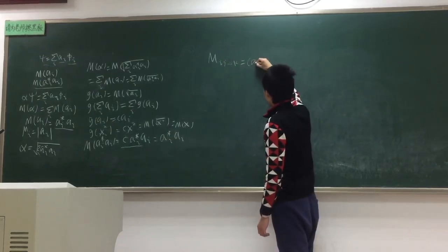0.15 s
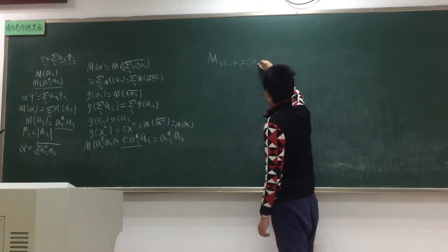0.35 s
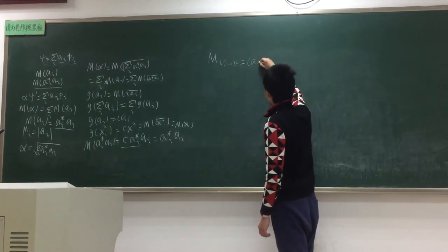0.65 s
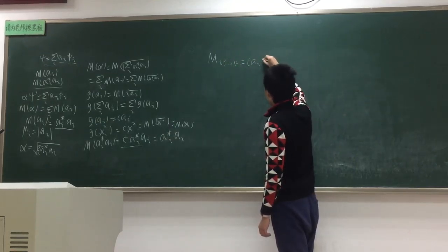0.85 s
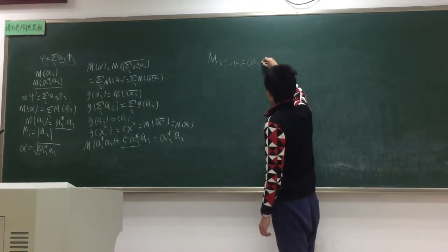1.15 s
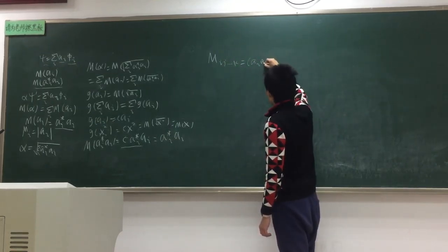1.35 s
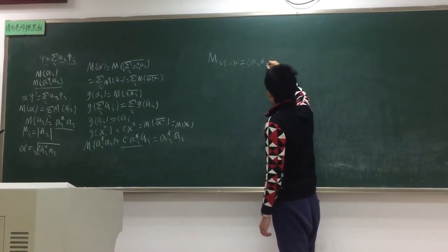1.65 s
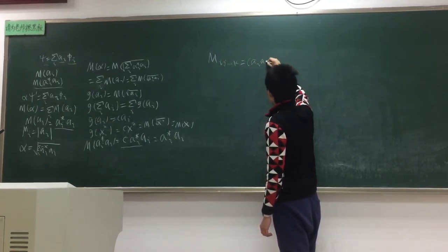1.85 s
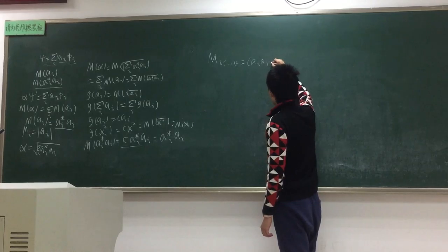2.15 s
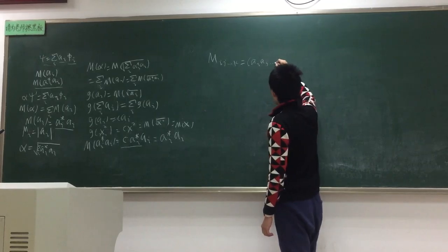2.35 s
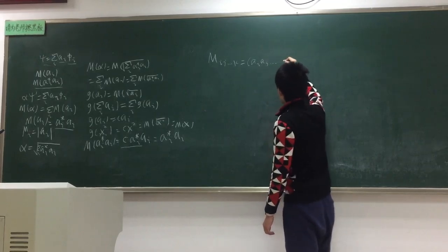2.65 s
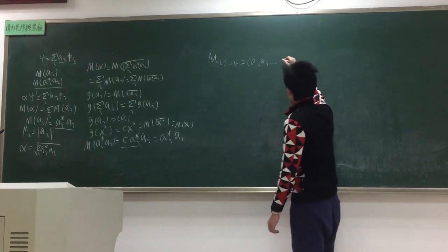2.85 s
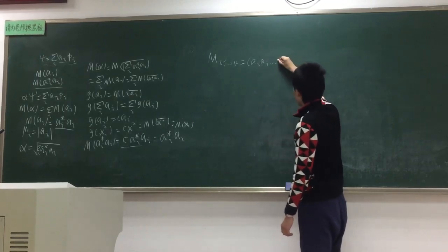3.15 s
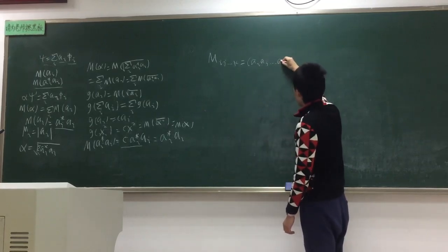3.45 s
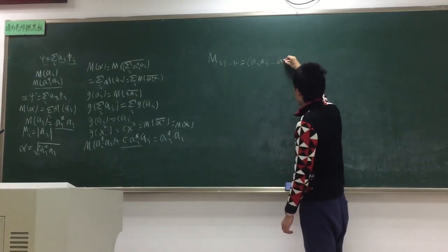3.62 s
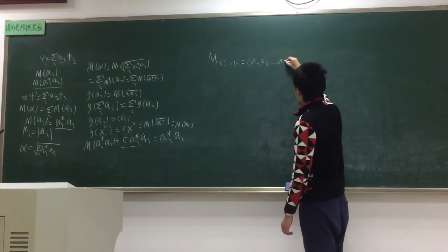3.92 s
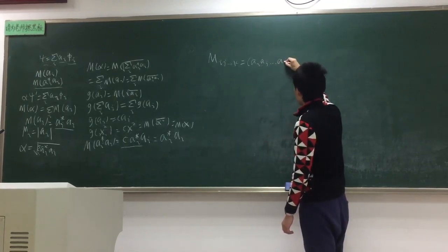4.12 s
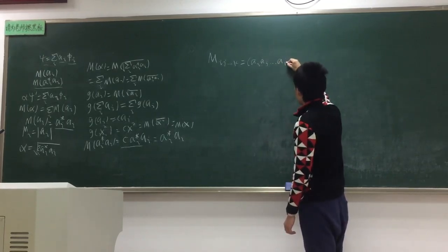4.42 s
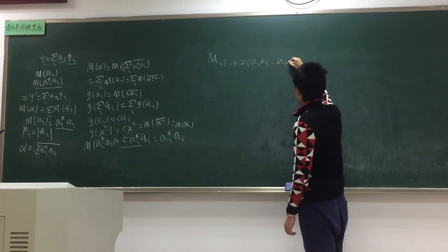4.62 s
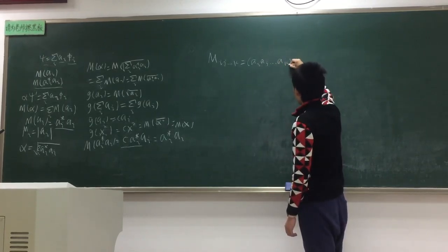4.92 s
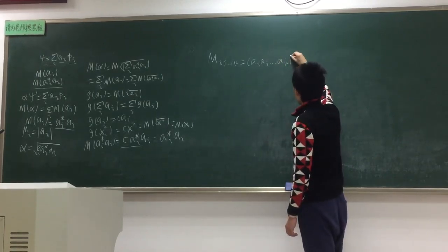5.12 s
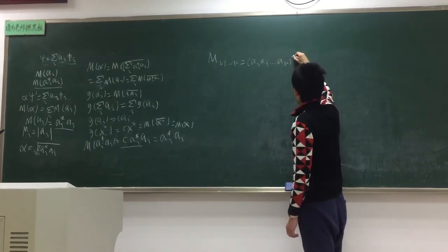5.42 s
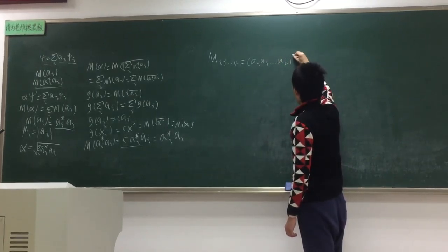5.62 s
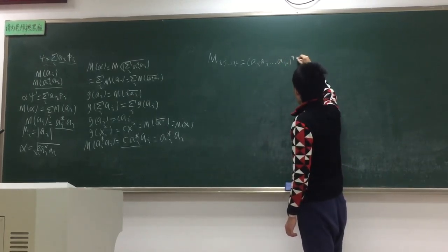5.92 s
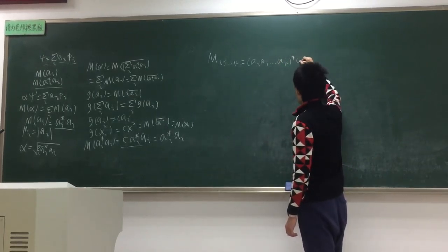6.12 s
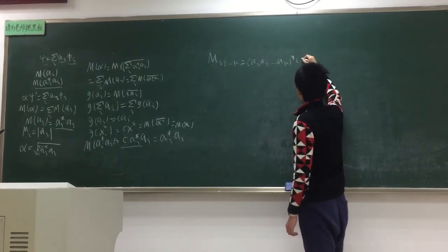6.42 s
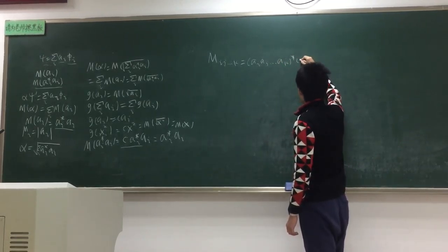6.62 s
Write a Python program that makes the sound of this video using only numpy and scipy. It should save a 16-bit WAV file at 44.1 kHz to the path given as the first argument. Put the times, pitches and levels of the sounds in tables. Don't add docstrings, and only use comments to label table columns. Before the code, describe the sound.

Uneven chalk blows on a hollow panel, some sharp and fizzy, others soft and dull, heard from a few metres in a reverberant classroom. Tiny crumbs tick between strokes. Around the middle, writing pauses for a short sliding step, soles hissing and small stones clicking on the floor. Lighter, then steadier knocks follow over quiet air hiss and low ventilation rumble.

```python
import sys
import numpy as np
from scipy import signal
from scipy.fft import rfft, irfft
from scipy.io import wavfile
from scipy.ndimage import uniform_filter1d

SR = 44100
rng = np.random.default_rng(int(sys.argv[2]) if len(sys.argv) > 2 else 0)


def transcribe(signal):
    frames = np.atleast_2d(signal).T
    limited = np.clip(frames, -1, 1)
    pcm = np.round(limited * 32767).astype(np.int16)
    wavfile.write(sys.argv[1], SR, pcm)


def gain_from_decibels(decibels):
    exponent = np.asarray(decibels, float) / 20
    return 10 ** exponent


N = 298510

# f/Hz, level/dB
PANEL_KNOCK = [(180, -43.5), (330, -26.5), (440, -17.5), (600, -7), (750, -4.5), (950, -4.5), (1100, -9),
               (1400, -13.5), (1650, -23.5), (2200, -57.5)]


def evened(x):
    return x / np.sqrt(np.mean(x ** 2) + 1e-20)


def read(points, hz):
    f, value = np.transpose(points)
    return np.interp(np.log(hz + 1), np.log(f + 1), value)


def add(mix, s, sound):
    part = mix[round(s * SR):][:len(sound)]
    part += sound[:len(part)]


def colour(x, points):
    gain = gain_from_decibels(read(points, np.fft.rfftfreq(len(x), 1 / SR)))
    return irfft(rfft(x) * gain, len(x))


def click(points):
    log_gain = np.log(gain_from_decibels(read(points, abs(np.fft.fftfreq(2048, 1 / SR)))))
    pulse = np.fft.ifft(np.exp(np.conj(signal.hilbert(log_gain)))).real[:1024]
    return pulse / abs(pulse).max()


def placed(points, tilt_db, place_db):
    middle = np.exp(np.mean(np.log([hz for hz, _ in points])))
    tilt_db = np.clip(tilt_db, -18, 18)
    return click([(hz, db + shift + tilt_db * np.log2(hz / middle))
                  for (hz, db), shift in zip(points, place_db)])


def ring(hz, t60, rise):
    t = np.arange(6000) / SR
    return gain_from_decibels(-60 * t / t60) * np.sin(2 * np.pi * hz * t) * (1 - np.exp(-t / rise))


def echoed(x, echoes):
    early = np.zeros(2500)
    early[0] = 1
    for s, db in echoes:
        early[round(s * SR)] = gain_from_decibels(db)
    return signal.oaconvolve(x, early)[:N]


def air():
    # f/Hz, level/dB per Hz
    hiss_spectrum = [(15, -51), (25, -19.5), (72, -5.5), (149, -15), (217, -26.5), (256, -27), (439, -33),
                     (489, -36), (988, -35), (1400, -40), (1840, -42), (2110, -41.5), (3620, -46.5),
                     (11600, -53), (16000, -55)]
    # f/Hz, width/Hz, level/dB
    resonances = [(52.5, 19.4, 0), (75, 42, 1), (106.8, 11.8, 4.5), (139, 65, -9.5)]
    # t/s, level/dB
    draught = [(0, -66.5), (.3, -70.5), (1.4, -66.5), (2.6, -66.5), (3.15, -60), (3.9, -66.5), (4.3, -66),
               (4.95, -61), (5.5, -68.5), (6.1, -69.5), (6.45, -62), (6.77, -67)]
    hiss_db, gust_db, gust_s = -59.5, 3, 0.059
    a, b, c = rng.standard_normal((N, 3)).T
    span = round(gust_s * SR)
    gusts_db = gust_db * evened(uniform_filter1d(uniform_filter1d(c, span), span))
    hz = np.fft.rfftfreq(N, 1 / SR)
    hiss = gain_from_decibels(hiss_db) * evened(colour(a, hiss_spectrum))
    hiss = irfft(rfft(hiss) * hz ** 4 / (hz ** 4 + 165.0 ** 4), N)
    ducts = sum(gain_from_decibels(db) / (1 + ((hz - f) / (width / 2)) ** 2) for f, width, db in resonances)
    s, db = np.transpose(draught)
    rumble_db = np.interp(np.arange(N) / SR, s, db) + gusts_db
    return hiss + gain_from_decibels(rumble_db) * evened(irfft(rfft(b) * ducts, N))


def tail():
    # f/Hz, t60/s
    walls = [(300, 0.73), (520, 0.74), (800, 0.81), (1400, 0.61), (2500, 0.67), (5500, 0.31), (12000, 0.25)]
    # f/Hz, level/dB
    wet = [(300, -1.5), (540, 9), (800, 9), (1400, 10.5), (2500, 0), (6000, 6.5), (13000, -2)]
    hz, t, z = signal.stft(rng.standard_normal(SR), SR, nperseg=256)
    decay = gain_from_decibels(-60 * t / read(walls, hz)[:, None])
    late = signal.istft(z * decay, SR, nperseg=256)[1][:SR]
    late *= np.clip(np.arange(SR) / SR / 0.012, 0, 1)
    late = np.roll(late / np.linalg.norm(late), 300)
    return np.roll(colour(late, wet), -300)


def room(x):
    earlier_tap_db = -58
    same, other, drift = tail(), [tail(), tail()], np.linspace(0, 7.5, N)
    out = 1.007 * signal.fftconvolve(x, same)[:N]
    out += 0.76 * signal.fftconvolve(x * np.cos(drift), other[0])[:N]
    out += 0.71 * signal.fftconvolve(x * np.sin(drift), other[1])[:N]
    before = signal.fftconvolve(placed(PANEL_KNOCK, -8.0, np.zeros(10)), same)[round(.25 * SR):]
    before *= gain_from_decibels(-40 * np.arange(len(before)) / SR)
    add(out, 0, gain_from_decibels(earlier_tap_db) * before / np.sqrt(np.mean(before[:2000] ** 2)))
    return out


def gripped(points, ring_hz, upper_db):
    upper_mode_hz = 3420
    hz = np.geomspace(1000, 4600, 60)
    peak_db = 4.5 * np.exp(-((hz - ring_hz) / 170.0) ** 2)
    return list(zip(hz, read(points, hz) + peak_db + upper_db * (hz > upper_mode_hz)))


def taps():
    # t/s, level/dB, chalk ring f/Hz, grip tilt/dB per octave, fizz level/dB re blow (tip hardness)
    blows = [(0.381, -26, 2700, -5, -26.5), (0.703, -26.5, 1890, 5.5, -24), (1.023, -39, 2360, 9, -76),
             (1.292, -65, 2460, 23, -36), (1.58, -26, 1980, -5.5, -22.5), (1.916, -34, 2030, -9, -36),
             (2.145, -26.5, 2350, 7, -39), (2.302, -30, 2780, 1, -22.5), (2.448, -27, 2850, 4, -28.5),
             (3.143, -53.5, 1700, -4, -83), (3.85, -57.5, 2550, 7, -34), (4.209, -39, 2560, 4, -36),
             (4.478, -34, 2540, 4, -51), (4.851, -29.5, 2220, -3.5, -31), (5.24, -29.5, 2190, -7.5, -29),
             (5.5, -30.5, 2800, 4.5, -36), (5.721, -34.5, 2050, -1, -48), (6.025, -28.5, 1810, 7.5, -33.5),
             (6.613, -37, 2080, -4, -57)]
    # f/Hz, t60/s
    lowest_mode = (538.6, 0.043)
    # f/Hz, level/dB
    stick = [(1100, -43), (1600, -4.5), (2000, -2.5), (2400, 2.5), (3050, -1.5), (3300, -16.5),
             (3700, -9.5), (4500, -61.5)]
    # f/Hz, level/dB
    edge_spectrum = [(2500, -70), (3500, 2), (4300, 6), (5600, 8), (7000, -2), (8500, -21.5)]
    # f/Hz, level/dB
    fizz_spectrum = [(5500, -48), (7600, 3.5), (9500, 7.5), (10600, 3), (14000, -3.5), (16000, -7.5)]
    firm_db, hard_db = -30, -35
    boom_db, boom_db_per_s, boom_per_soft_db = 2, 0.84, 0.384
    knock_db, knock_per_soft_db, knock_per_fizz_db = -10.5, 0.1173, 0.0573
    edge_db, edge_per_fizz_db, upper_per_fizz_db = -24, 0.29, 0.19
    panel_tilt_db, panel_tilt_db_per_s, fizz_tilt_db = -0.24, 0.22, 11
    spot_spread_db = 1.8
    boom, panel, chalk = np.zeros((3, N))
    place, dust = rng.standard_normal((len(blows), 10)), rng.standard_normal((len(blows), 600))
    for (s, db, ring_hz, grip_db, fizz_db), p, d in zip(blows, place, dust):
        soft_db, extra_fizz_db = firm_db - db, fizz_db - hard_db
        low_db = db + boom_db + boom_db_per_s * s + boom_per_soft_db * soft_db
        add(boom, s + 0.0012, gain_from_decibels(low_db) * ring(*lowest_mode, 0.0038))
        tilt_db = panel_tilt_db + panel_tilt_db_per_s * (s - 3)
        add(panel, s + 0.001208, gain_from_decibels(db - 6.0) * placed(PANEL_KNOCK, tilt_db, spot_spread_db * p))
        stick_db = knock_db + knock_per_soft_db * soft_db + knock_per_fizz_db * extra_fizz_db
        held = gripped(stick, ring_hz, upper_per_fizz_db * extra_fizz_db)
        knock = gain_from_decibels(stick_db) * placed(held, grip_db, np.repeat(p, 6))
        knock += gain_from_decibels(edge_db + edge_per_fizz_db * extra_fizz_db) * click(edge_spectrum)
        knock += gain_from_decibels(fizz_db + 6.5) * placed(fizz_spectrum, fizz_tilt_db, p)
        add(chalk, s + 0.000771, gain_from_decibels(db) * knock)
        brush = d * gain_from_decibels(np.linspace(-60, -38, 600))
        add(chalk, s - 600 / SR, gain_from_decibels(db) * signal.oaconvolve(brush, knock))
    boom = signal.sosfilt(signal.butter(4, 420, "high", fs=SR, output="sos"), boom)
    return boom, panel, chalk


def lifts():
    # t/s, level/dB
    releases = [(0.8676, -61), (1.2114, -60.5), (1.3768, -60), (2.6873, -62), (3.2394, -78), (3.2685, -77),
                (3.338, -68), (5.014, -59), (5.669, -62), (5.9249, -83), (6.0646, -79), (6.1789, -56)]
    crumble_t60_s = 0.0082
    out, t = np.zeros(N), np.arange(300) / SR
    tick = click([(4000, -44), (7000, -8), (9000, -6), (14000, -9), (16000, -18.5)])
    for (s, db), d in zip(releases, rng.standard_normal((len(releases), 300))):
        crumbs = d ** 3 * gain_from_decibels(-60 * t / crumble_t60_s)
        add(out, s, gain_from_decibels(db + 4.5) * np.convolve(tick, crumbs / np.linalg.norm(crumbs)))
    return out


def grit():
    # t/s, level/dB, f/Hz
    stones = [(1.29, -62, 2560), (1.297, -62.5, 827), (1.308, -63.5, 2630), (2.709, -53, 308),
              (2.9098, -44.5, 2880), (2.911, -53, 1880), (2.93, -52, 2170), (2.94, -57, 630),
              (2.955, -54, 2350), (3.174, -48, 793), (3.239, -63, 2360), (3.245, -53.5, 974),
              (3.269, -54, 2800), (3.27, -57, 3650), (3.298, -48.5, 441), (3.35, -60, 1970),
              (3.4, -57, 1900), (3.432, -56, 2930)]
    # t/s, level/dB
    thuds = [
        (0.944, -57),
        (1.95, -63),
        (2.099, -60),
        (5.52, -59),
        (6.03, -57),
    ]
    # f/Hz, t60/s
    floor_mode = (182.5, 0.087)
    t60_s, t60_slope = 0.036, 0.52
    out = np.zeros(N)
    for s, db, hz in stones:
        add(out, s, gain_from_decibels(db + 2.5) * ring(hz, t60_s * (1000 / hz) ** t60_slope, 0.00012))
    for s, db in thuds:
        add(out, s, gain_from_decibels(db + 3.5) * ring(*floor_mode, 0.00023))
    return out


def shoes():
    # fastest t/s, speed-up t/s, slow-down t/s, hiss level/dB, drag level/dB
    slides = [
        (2.696, 0.022, 0.042, -61.5, -69),
        (2.922, 0.13, 0.083, -60, -64.5),
        (3.11, 0.12, 0.084, -73.5, -70.5),
        (3.268, 0.035, 0.079, -65.5, -58.5),
        (3.382, 0.11, 0.092, -59.5, -68.5),
    ]
    # f/Hz, level/dB per Hz
    sole = [(710, -49), (1200, -12), (1880, -9), (2510, -10.5), (2950, -6), (3350, -11.5), (4110, -18),
            (6040, -17.5), (7650, -23.5), (15500, -38)]
    # f/Hz, level/dB per Hz
    drag_spectrum = [(130, -3), (200, 1.5), (300, -1.5), (500, 0), (1000, -3), (1400, -46)]
    hiss_range_db, drag_range_db = 12.5, 6
    drag_lead_s = 0.0096
    grains_per_s, grain_db, grain_spread_db = 270, -9, 1.5
    t = np.arange(N) / SR
    a, b, c = rng.standard_normal((N, 3)).T
    grain = gain_from_decibels(0.65 * evened(uniform_filter1d(c, 90)))
    caught = rng.random(N) < grains_per_s / SR
    specks = caught * gain_from_decibels(grain_db + grain_spread_db * np.minimum(rng.exponential(1, N), 3))
    grain = grain * (1 + signal.lfilter([1], [1, -.985], specks))
    hiss, drag = np.zeros((2, N))
    for s, rise, fall, hiss_db, drag_db in slides:
        for power, db, range_db, late in ((hiss, hiss_db, hiss_range_db, t - s),
                                          (drag, drag_db, drag_range_db, t - s + drag_lead_s)):
            slack = np.maximum(-late / rise, late / fall)
            add(power, 0, gain_from_decibels(db - range_db * slack * np.maximum(slack, 1)) ** 2)
    hiss_noise = evened(colour(a * grain, [(700, -69)] + sole))
    drag_noise = evened(colour(b * grain, [(80, -84)] + drag_spectrum + [(2500, -71)]))
    return np.sqrt(hiss) * hiss_noise + np.sqrt(drag) * drag_noise


def scene():
    # delay t/s, level/dB
    echoes = [(.0042, 3), (.008, 4), (0.0123, -24), (.0145, 2.5), (.019, -9.5), (0.026, -2.5)]
    # delay t/s, level/dB
    returns = [(.0032, 1), (.0052, 2), (.009, -15.5), (0.0149, -3)]
    # f/Hz, level/dB
    return_colour = [(1500, -2.5), (3200, 0), (4500, -2), (12000, -4)]
    (boom, panel, chalk), stones = taps(), grit()
    wet = room(gain_from_decibels(-25) * boom + panel + chalk + gain_from_decibels(-14) * stones)
    rebounds = colour(echoed(chalk, returns) - chalk, return_colour)
    near = boom + echoed(panel, echoes) + chalk + rebounds + stones
    return (near + wet + lifts() + shoes() + air())[None]


def top_cut(x):
    return signal.sosfilt(signal.butter(12, 16330, fs=SR, output="sos"), x)


def record(dry):
    # f/Hz, level/dB
    microphone = [(7000, 0.5), (7600, -2.5), (8300, 0), (9800, 0), (10450, -5.5), (11100, -0.5)]
    edge_hz, top_hz = 15800, 15100
    top_opens_db = 1.2
    heard = colour(dry[0], microphone)[None]
    full, dull, low = (signal.oaconvolve(heard, signal.firwin(767, hz, fs=SR)[None], "same")
                       for hz in (edge_hz, top_hz, 8000))
    treble_db = 10 * np.log10(abs(uniform_filter1d((dull - low) ** 2, 2048)) + 1e-14)
    lively = treble_db > np.median(treble_db) + top_opens_db
    opened = uniform_filter1d(1. * lively, 600)
    return top_cut(dull + opened * (full - dull))


dry = scene()
out = record(dry)
transcribe(out)
```